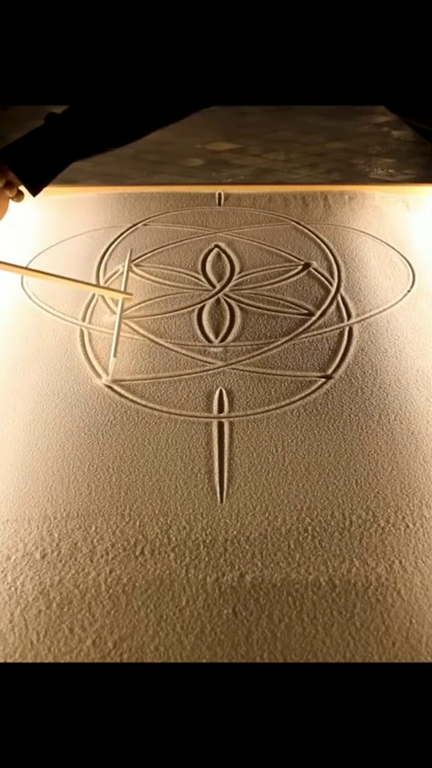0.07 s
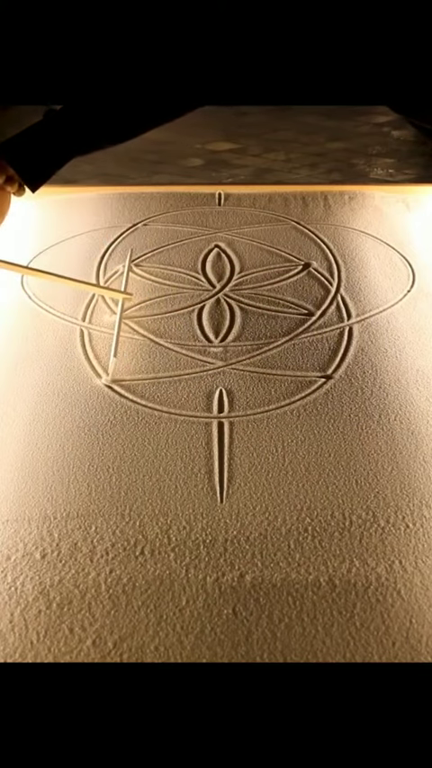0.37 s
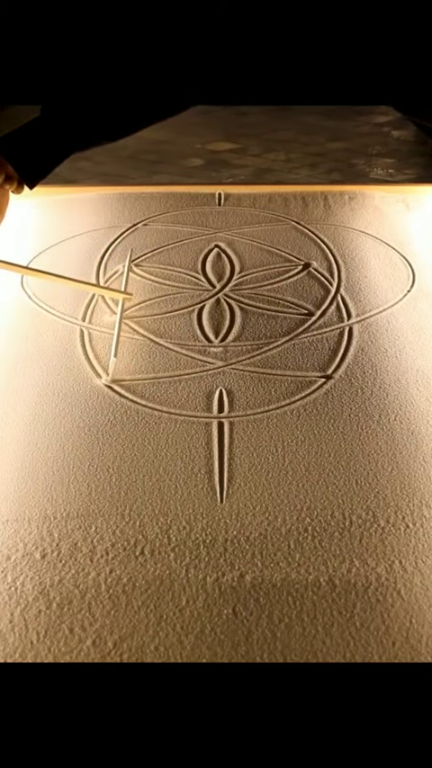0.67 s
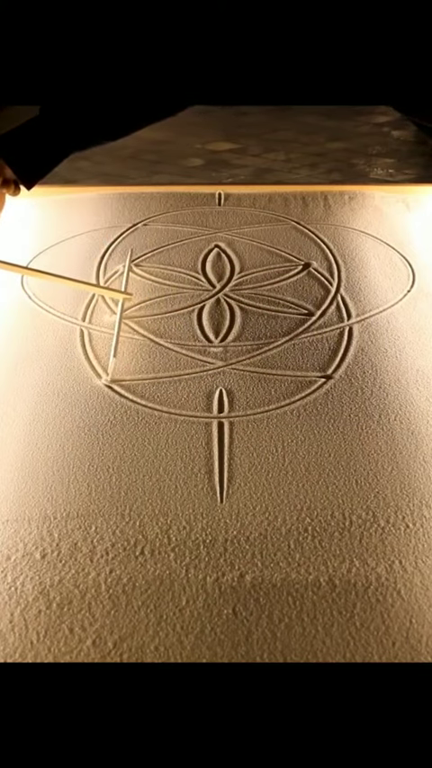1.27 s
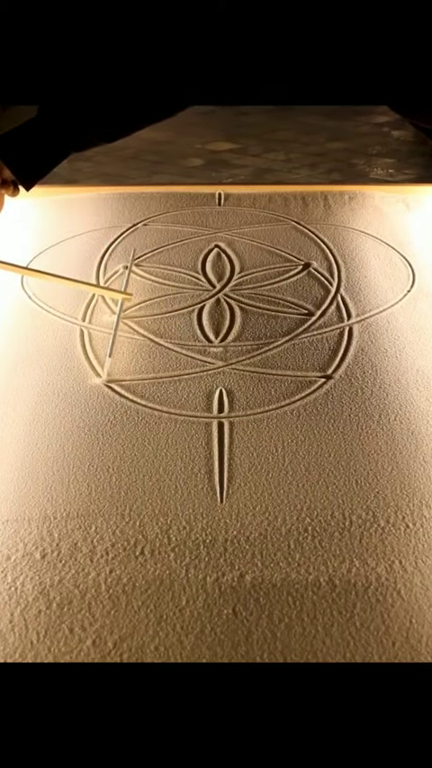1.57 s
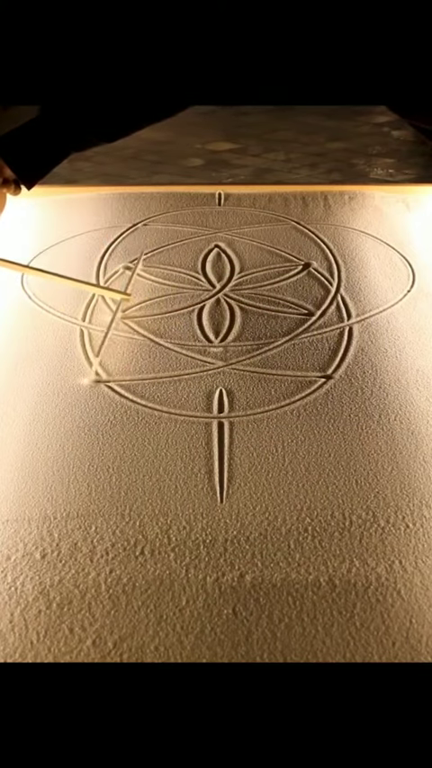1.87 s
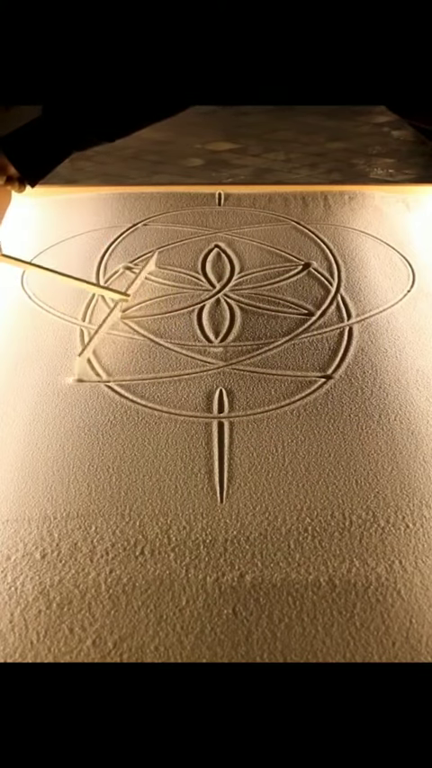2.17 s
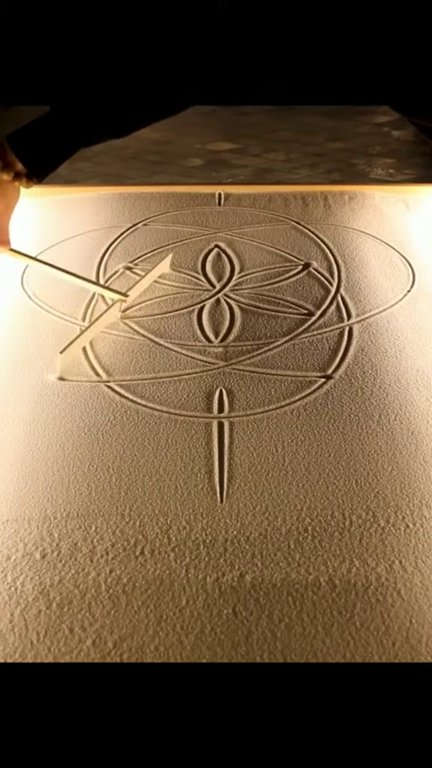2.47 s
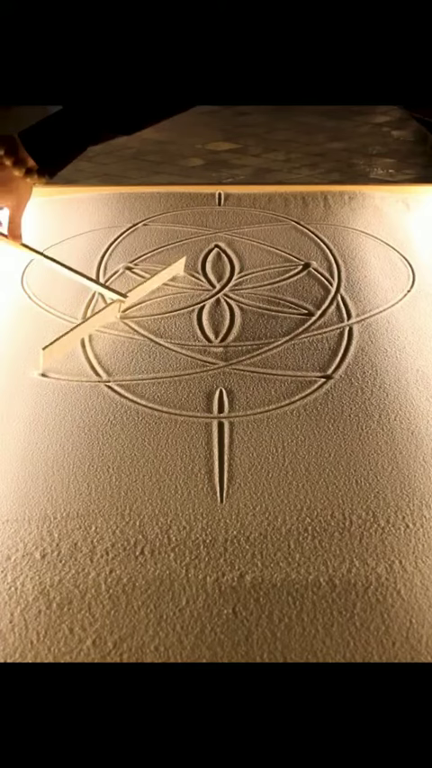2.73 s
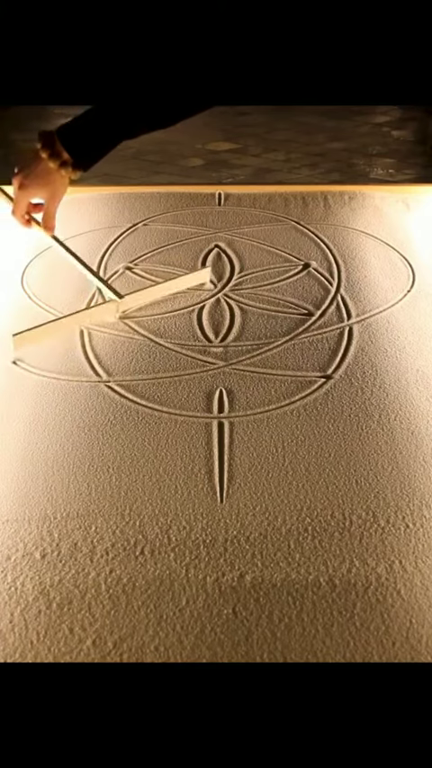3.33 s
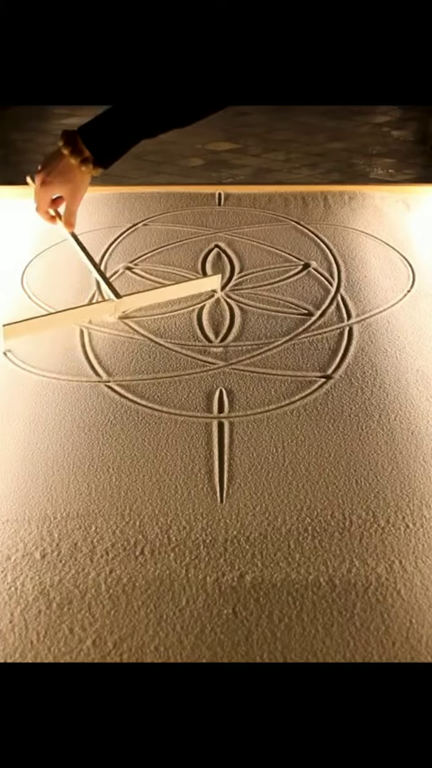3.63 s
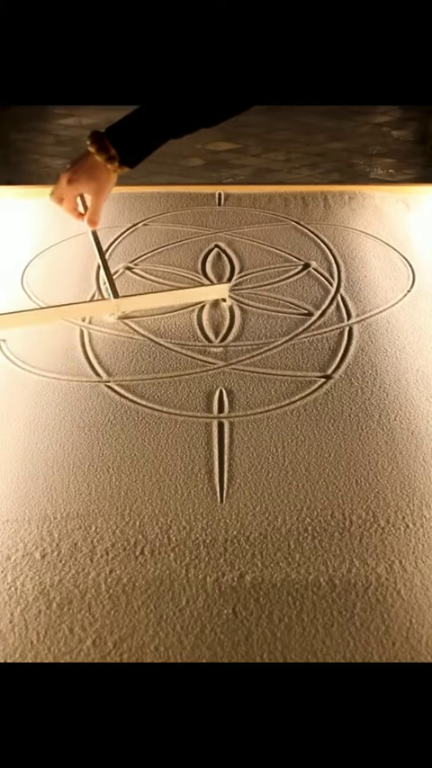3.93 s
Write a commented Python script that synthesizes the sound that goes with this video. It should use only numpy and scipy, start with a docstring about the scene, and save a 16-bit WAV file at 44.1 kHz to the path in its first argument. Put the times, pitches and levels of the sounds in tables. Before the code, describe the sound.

A wooden rake scrapes through fine sand, faint at first, then louder with small crunches.

```python
"""In a quiet room, close by, a wooden rake rests in a tray of fine sand, creeps, then is dragged
and swung round. Grains slip under the blade in small clumps and ring its wood; now and then it
catches and lets go with a crunch or a tick. As it swings, the ring of its tip and the rasp of its
edge fade and the low body takes over. Ventilation rumbles underneath."""
import sys
import numpy as np
from scipy import signal
from scipy.fft import rfft, irfft
from scipy.io import wavfile
from scipy.ndimage import map_coordinates

SR = 44100
rng = np.random.default_rng(int(sys.argv[2]) if len(sys.argv) > 2 else 0)


def wrap_up_sound(samples):
    """Save the sound to the file named by the first command line argument, as 16-bit audio."""
    columns = np.atleast_2d(samples).T
    # keep every value between -1 and 1, then stretch to whole-number steps
    tamed = np.clip(columns, -1, 1)
    steps = np.round(tamed * 32767).astype(np.int16)
    wavfile.write(sys.argv[1], SR, steps)


N = 176400
HZ, T = np.fft.rfftfreq(N, 1 / SR), np.arange(N) / SR
BAND_LIMIT_HZ = 13150


def amp(db):
    """Decibels to gain."""
    return 10 ** (np.asarray(db) / 20)


def unit(x):
    """Scale to rms 1."""
    return x / np.sqrt(np.mean(x ** 2) + 1e-20)


def over_hz(points):
    """Interpolate (Hz, value) rows on a log frequency axis."""
    hz, value = np.transpose(points)
    return np.interp(np.log(HZ + 1), np.log(hz + 1), value)


def envelope(points):
    """Gain from (seconds, dB) rows, silent before the first."""
    return amp(np.interp(T, *np.transpose(points), left=-np.inf))


def resonances(modes):
    """Power response of a set of modes."""
    return sum(amp(db) ** 2 / (1 + 2 * ((HZ - hz) / width) ** 2) ** 2 for hz, width, db in modes)


def minimum_phase(power):
    """Response of this spectral shape that rings only after its cause."""
    cepstrum = irfft(np.log(power / power.max() + 1e-10) / 2, N)
    fold = 1 + np.sign(N / 2 - np.arange(N))
    fold[0] = 1
    return np.exp(rfft(cepstrum * fold))


def wander(rate_hz):
    """Smooth random motion up to a rate, rms 1."""
    spectrum = rfft(rng.standard_normal(N)) / (1 + (HZ / rate_hz) ** 2)
    return unit(irfft(spectrum * HZ / (HZ + 2), N))


def stereo_spectra(two, coherence):
    """Mix two unrelated signals into left and right spectra of given coherence."""
    mid, side = rfft(two) * np.sqrt([(1 + coherence) / 2, (1 - coherence) / 2])
    return np.array([mid + side, mid - side])


def grains(per_s, spread_db=3.5):
    """Two trains of tiny impacts, most small, a few large."""
    hit, impacts = rng.random((2, N)) < per_s / SR, np.zeros((2, N))
    size = rng.exponential(1, (2, N))[hit]
    sign = rng.choice([-1, 1], (2, N))[hit]
    impacts[hit] = sign * amp(spread_db * np.minimum(size, 4.5))
    return unit(impacts)


def burst(start_s, length_s):
    """Quick swell, longer fall, peak 1."""
    age = np.clip((T - start_s) / length_s * 3, 0, 20)
    return age * np.exp(1 - age)


# Microphone pair. Each row: frequency in Hz, coherence from 0 to 1.
MIC_COHERENCE = [(100, .6), (300, .85), (560, .65), (1100, .88), (1550, .76), (2100, .96), (3400, .91),
                 (4000, .8), (4400, .87), (5600, .72), (6400, .56), (6900, .25), (8800, .42), (10500, .27),
                 (11300, .55), (13000, .58)]
# Each row: frequency in Hz, phase lead of left in radians.
MIC_LEAD_RAD = [(0, 0), (500, .2), (1200, .05), (3500, .1), (5000, .45), (6100, .4), (7500, 1),
                (9000, 1.25), (11200, 1.7), (12000, 2.3), (13500, 2.3)]
# Each row: frequency in Hz, left minus right in dB.
MIC_BALANCE_DB = [(100, 7), (330, -1.5), (700, 0), (2000, -0.3), (5000, 1.1), (13000, .5)]


def at_mics(drive, power):
    """Impacts ring a power response and reach the two microphones."""
    left_over_right = amp(over_hz(MIC_BALANCE_DB)) * np.exp(1j * over_hz(MIC_LEAD_RAD))
    spectra = stereo_spectra(drive, over_hz(MIC_COHERENCE)) * left_over_right ** np.array([[.5], [-.5]])
    response = minimum_phase(power) / np.sqrt(np.mean(power / power.max()))
    return irfft(spectra * response, N)


# Room air. Each row: frequency in Hz, relative density in dB.
AIR_SPECTRUM = [(10, -29), (25, 9), (55, -7), (80, 0), (115, -1.5), (140, -7.5), (185, -7), (260, -8.5),
                (400, -15), (700, -18), (1500, -23), (3500, -26.5), (8000, -30.5), (13000, -30.5)]
# Each row: frequency in Hz, stereo coherence from 0 to 1.
AIR_COHERENCE = [(30, 0.68), (70, 0), (130, 0.3), (280, 0.5), (610, 0), (1500, 0.082), (13000, 0)]
# Drone. Each row: frequency in Hz, starting level in dB, level waver in dB,
# phase waver in radians, fade in dB per second.
DRONE_TONES = [(35.2, -52, 2.5, 0.55, 0.76), (77.2, -54.5, 2.5, 0.67, 2.3)]


def ventilation(air_db=-54, waver_hz=5, balance_db=-3):
    """Steady air noise and a low, wavering drone, louder on the right."""
    noise = stereo_spectra(rng.standard_normal((2, N)), over_hz(AIR_COHERENCE))
    air = irfft(noise * amp(over_hz(AIR_SPECTRUM)), N)
    drone = np.zeros(N)
    for hz, db, waver_db, waver_rad, fade_db_per_s in DRONE_TONES:
        waver = amp(waver_db * wander(waver_hz))
        tone = np.sin(2 * np.pi * hz * T + waver_rad * wander(waver_hz))
        drone += amp(db - fade_db_per_s * T) * unit(waver * tone)
    return amp(air_db) * unit(air) + drone * amp(balance_db * np.array([[.5], [-.5]]))


# Trickles. Each row: start in seconds, length in seconds, level in dB.
TRICKLES = [(0.01, 0.07, -60), (0.151, 0.06, -58.5), (.28, 0.027, -64), (0.467, 0.048, -66),
            (0.755, 0.06, -61.5), (0.859, 0.034, -56), (1.276, .06, -58.5), (1.41, 0.14, -65),
            (1.513, 0.084, -59)]
# Loose sand. Each row: frequency in Hz, relative density in dB.
TRICKLE_SPECTRUM = [(100, -15), (400, -5), (2000, 3.5), (4200, 0), (5500, 2), (7000, -1.5), (9000, 2),
                    (13000, -1.5)]


def trickles(rough_db=3, rough_hz=70):
    """The nearly still blade nudges loose grains, which tumble unevenly."""
    flow = sum(burst(start, length) * amp(db) for start, length, db in TRICKLES)
    flow *= unit(amp(rough_db * wander(rough_hz)))
    return at_mics(grains(per_s=3200) * flow, amp(over_hz(TRICKLE_SPECTRUM)) ** 2)


def clumps(per_s=190, decay_s=0.0044, spread_db=1, steady_share=0.46):
    """Gain of the flow as packed sand breaks in clumps that start at once and trickle out."""
    energy = amp(spread_db * np.minimum(rng.exponential(1, N), 3.5)) ** 2
    breaks = rng.random(N) < per_s / SR
    power = signal.lfilter([1], [1, -np.exp(-1 / (decay_s * SR))], energy * breaks)
    return np.sqrt(steady_share + (1 - steady_share) * power / power.mean())


def sticking(dip_db=1.5):
    """Gain that dips as the blade sticks just before each crunch or tick."""
    stuck = np.zeros(N)
    for start, *_, stick_s in CRUNCHES + GRAIN_TICKS:
        from_centre = (T - start) / stick_s * 2 + 1
        stuck += np.exp(-np.minimum(from_centre ** 2, 4) ** 2)
    return amp(-dip_db * stuck)


def dig_and_ride(sound, pitch_share=.007, rate_hz=14):
    """Resonances shift as the blade digs in and rides up; done by uneven resampling."""
    position = np.arange(N) + np.cumsum(pitch_share * wander(rate_hz))
    return np.array([map_coordinates(side, [position], order=3, mode="nearest") for side in sound])


# Scrape. Each row: time in seconds, then bass, low mid, mid, upper mid, treble in dB before trim.
SCRAPE_DB = [(1.42, -80, -82, -82, -86, -84), (1.53, -71, -72, -67, -68, -65),
             (1.6, -66, -66.5, -60.5, -62, -57), (1.73, -62, -65.5, -61.5, -64, -57.5),
             (2.05, -60, -60.5, -58.5, -61, -54.5), (2.25, -55.5, -55.5, -55, -58, -53.5),
             (2.5, -54, -53.5, -54.5, -57, -53.5), (2.67, -52.5, -51.5, -53, -55, -52),
             (2.78, -53, -50.5, -49.5, -53, -48.5), (2.87, -51, -50, -48.5, -52, -46.5),
             (3.0, -51, -49.5, -49, -53, -46.5), (3.15, -53.5, -52, -51.5, -53.5, -47),
             (3.36, -52.5, -52, -52, -54.5, -47), (3.48, -52.5, -49.5, -49, -53.5, -44.5),
             (3.6, -52, -51, -52.5, -55.5, -49), (3.75, -51.5, -50, -53.5, -57, -52),
             (3.85, -50.5, -50, -54, -57.5, -51.5), (4.0, -52, -50.5, -53.5, -56.5, -50)]
# The four boundaries of those bands in Hz.
BAND_EDGES_HZ = [650, 1500, 3600, 7000]
# One trim per band in dB.
TRIMS_DB = [0.59, 0.077, -0.18, -0.31, 0.12]
# Crushed sand. Each row: frequency in Hz, relative density in dB.
SAND_SPECTRUM = [(60, -8.5), (150, -13), (280, -3), (900, -4.5), (1520, -5.5), (2700, -4), (3300, -1.5),
                 (3570, -11), (3900, -13.5), (4300, -11.5), (4620, -13.5), (5100, -10), (6000, -15),
                 (6450, -15), (7100, -20.5), (7900, -10), (8850, -3.5), (9350, -12.5), (10050, -2.5),
                 (10650, -12), (11300, 0.5), (11900, -9), (12400, -0.5), (13000, -14.5)]
# Modes of the rake's body, tip and edge. Each row: frequency in Hz, width in Hz, relative level in dB.
WOOD_MODES = [(178, 16, 6), (316, 50, 6.5), (409, 20, 3), (522, 90, 1), (700, 70, 0), (793, 45, 5),
              (1050, 100, 5), (1220, 100, 3), (1900, 135, 0), (2190, 110, -1.5), (2500, 130, -2.5),
              (3130, 185, 4), (3402, 75, 3), (5500, 230, -.5)]
TIP_MODES = [(1975, 112, 3), (3810, 94, 4.5), (4480, 76, -4.5)]
EDGE_MODES = [(4872, 75, 3), (5010, 170, -5.5), (5366, 190, -2.5), (5580, 180, 4.5), (6370, 130, -0.5)]
# Ring of the tip and rasp of the edge. Each row: time in seconds, level in dB.
TIP_RING_DB = [(1.56, -66), (1.66, -69.5), (2.05, -63.5), (2.3, -56), (2.55, -55.5), (2.85, -49.5),
               (3.05, -56), (3.2, -62), (4, -61.5)]
EDGE_RASP_DB = [(1.55, -63), (1.64, -64.5), (2.05, -62.5), (2.25, -53), (2.55, -52.5), (2.67, -46.5),
                (2.75, -49), (2.88, -47.5), (3.03, -51), (3.15, -57), (3.5, -65.5), (4, -66)]
SLIP_GRAINS_PER_S = 11000


def scrape(slip_db=0.87, slip_hz=16, band_waver_db=0.43, band_waver_hz=2.4):
    """Grains slip in clumps under the moving blade and ring its wood, tip and edge."""
    push = amp(slip_db * wander(slip_hz)) * sticking() * clumps()
    drive = grains(SLIP_GRAINS_PER_S) * push
    power = (resonances(WOOD_MODES) + amp(over_hz(SAND_SPECTRUM)) ** 2) * (HZ < BAND_LIMIT_HZ)
    times, *band_levels = np.transpose(SCRAPE_DB)
    lowpasses = [0] + [1 / (1 + (HZ / hz) ** 24) for hz in BAND_EDGES_HZ] + [1]
    sound = np.zeros((2, N))
    for lower, upper, levels, trim_db in zip(lowpasses, lowpasses[1:], band_levels, TRIMS_DB):
        band = unit(at_mics(drive, power * np.maximum(upper - lower, 0)))
        level_db = np.interp(T, times, levels, left=-np.inf) + trim_db
        sound += band * amp(level_db + band_waver_db * wander(band_waver_hz))
    for modes, levels in ((TIP_MODES, TIP_RING_DB), (EDGE_MODES, EDGE_RASP_DB)):
        ring = at_mics(grains(SLIP_GRAINS_PER_S) * push, resonances(modes))
        sound += unit(ring) * envelope(levels)
    return dig_and_ride(sound)


# Each row: start in seconds, length in seconds, relative level in dB,
# nominal treble tilt in dB, sticking time beforehand in seconds.
CRUNCHES = [(1.619, 0.017, -46.5, 5.5, 0.003), (1.643, 0.013, -42.5, 6, .004), (1.835, 0.01, -44, 11, .005),
            (2.067, .02, -48.5, 2, 0.0045), (2.127, 0.013, -43, 7, 0.0037),
            (2.387, 0.0085, -39.5, 6, 0.013), (2.579, 0.015, -40, -6, 0.012),
            (2.649, 0.017, -40.5, -2, 0.057), (2.711, 0.054, -45.5, -7.5, .025),
            (2.851, 0.023, -39.5, -6.5, 0.0041), (2.877, 0.0091, -35, 6, 0.0017),
            (2.998, 0.0061, -35, -5, 0.018), (3.042, 0.0058, -31.5, -2.5, 0.012),
            (3.099, 0.011, -40, 0.5, 0.014), (3.138, 0.0053, -44, 17, 0.021), (3.281, 0.018, -36, 0, 0.014),
            (3.385, 0.015, -37, -4.5, 0.042), (3.46, 0.022, -34, 2.5, 0.006),
            (3.674, 0.015, -41, -10, 0.0092)]


def crunches(split_hz=3600, gain_db=-6.5):
    """The caught blade lets go: packed sand gives way in a short, dense burst."""
    power = resonances(WOOD_MODES) + amp(over_hz(SAND_SPECTRUM)) ** 2 * (HZ < BAND_LIMIT_HZ)
    treble = HZ ** 4 / (HZ ** 4 + split_hz ** 4)
    drive = rng.choice([-1., 1.], (2, N))
    sound = np.zeros((2, N))
    for tilt_share, band in ((-0.61, 1 - treble), (0.5, treble)):
        push = sum(burst(start, length) * amp(db + tilt_share * tilt_db)
                   for start, length, db, tilt_db, _ in CRUNCHES)
        sound += at_mics(drive * push, power * band)
    return sound * amp(gain_db)


# Low mode of the wood. One row: frequency in Hz, width in Hz, relative level in dB.
HOLLOW_MODE = [(328.5, 11.7, 0)]
# Its swell as the rake swings round. Each row: time in seconds, level in dB.
HOLLOW_SWELL_DB = [(2.5, -65), (2.76, -60.5), (2.84, -53), (3.03, -54), (3.12, -58.5), (3.27, -53),
                   (3.45, -57.5), (3.6, -53), (3.7, -53), (3.78, -46), (3.94, -45.4), (4, -52)]


def hollow_note(grip=.7):
    """Slipping grains hold the wood's low note as a drone; grip, 0 to 1, evens its level."""
    note = at_mics(grains(SLIP_GRAINS_PER_S), resonances(HOLLOW_MODE))
    amplitude = abs(signal.hilbert(note.mean(0)))
    held = note / (amplitude + amplitude.mean() / 10) ** grip
    return unit(held) * envelope(HOLLOW_SWELL_DB)


# Each row: start in seconds, length in seconds, relative level in dB,
# boosted resonance in Hz, sticking time beforehand in seconds.
GRAIN_TICKS = [(3.0484, .002, -39.5, 5400, .002), (3.0602, .0022, -35, 5700, .005),
               (3.0876, .0019, -29.5, 5750, .022), (3.3278, .003, -35.5, 3120, .012),
               (3.3365, .004, -38, 12400, .004), (3.3854, .003, -35.5, 5450, .02),
               (3.3912, .003, -39, 3150, .002)]
# High modes of the blade. Each row: frequency in Hz, width in Hz, relative level in dB.
TICK_MODES = [(3120, 300, -3), (4500, 5000, -12), (5600, 400, -1), (8900, 600, .5), (11400, 600, 4),
              (12600, 600, 0)]


def ticks(ring_db=5, ring_q=12, gain_db=-4):
    """Coarse grains snap free; each rings the blade, one resonance most of all."""
    drive = np.zeros((2, N))
    for start, length, db, ring_hz, _ in GRAIN_TICKS:
        snap = rng.choice([-1., 1.], (2, N)) * burst(start, length) * amp(db)
        ring = signal.lfilter(*signal.iirpeak(ring_hz, ring_q, SR), snap)
        drive += snap + amp(ring_db) * ring
    return at_mics(drive, resonances(TICK_MODES)) * amp(gain_db)


def reflections(sound, t60_s=0.063, first_s=0.0037, per_s=2000):
    """Short, thin tail from the tray and nearby walls."""
    taps = rng.standard_normal((2, N)) * (rng.random((2, N)) < per_s / SR)
    decay = amp(-60 * T / t60_s) * (T > first_s)
    tail = irfft(stereo_spectra(taps * decay, over_hz(MIC_COHERENCE)), N)[:, :SR // 4]
    return signal.fftconvolve(sound, tail / np.linalg.norm(tail[0]), axes=1)[:, :N]


def scene():
    """The rake in the sand and its reflections, over the ventilation."""
    rake = scrape() + hollow_note() + crunches() + ticks() + trickles()
    echo_gain = amp(-5)
    rake_in_room = (rake + echo_gain * reflections(rake)) / np.sqrt(1 + echo_gain ** 2)
    return rake_in_room + ventilation()


def record(dry):
    """Steep low-pass at the band limit."""
    lowpass = signal.firwin(511, BAND_LIMIT_HZ, window=("kaiser", 9), fs=SR)
    return signal.oaconvolve(dry, lowpass[None], "same")


dry = scene()
out = record(dry)
wrap_up_sound(out)
```